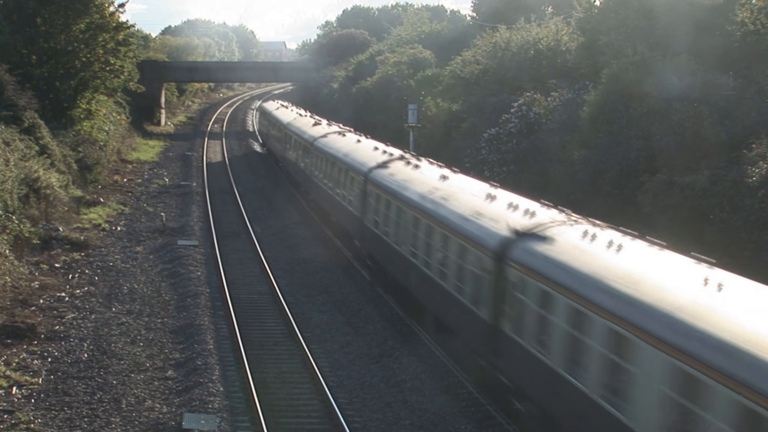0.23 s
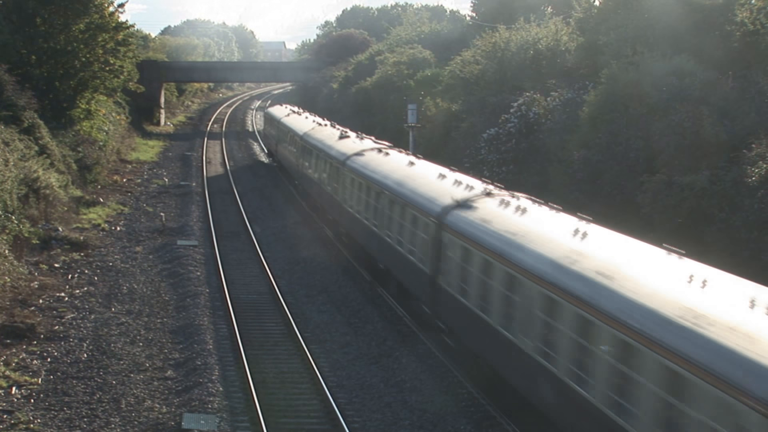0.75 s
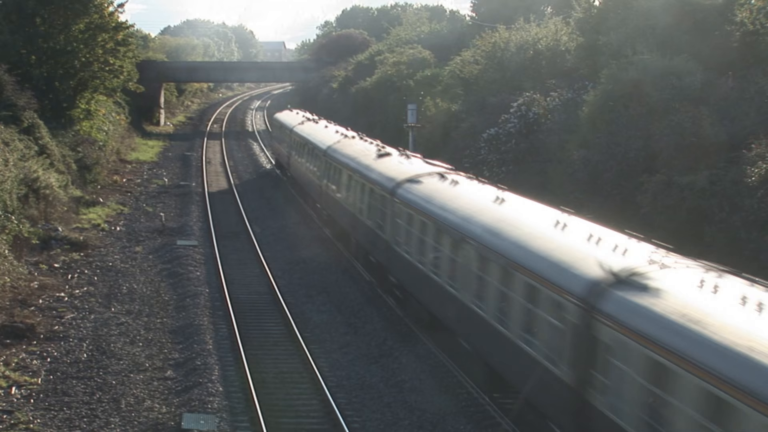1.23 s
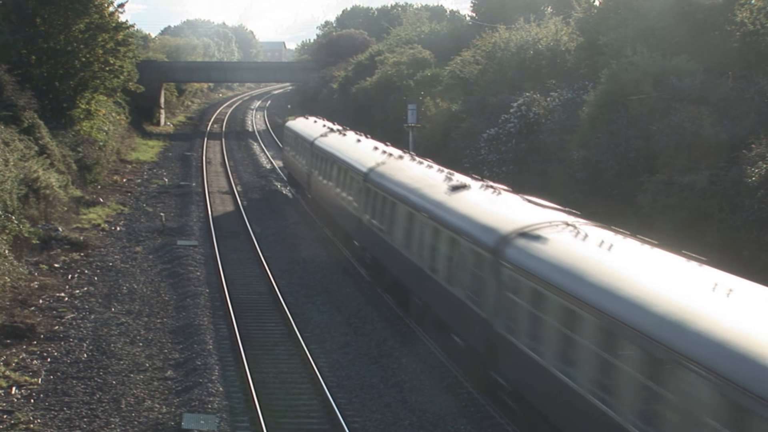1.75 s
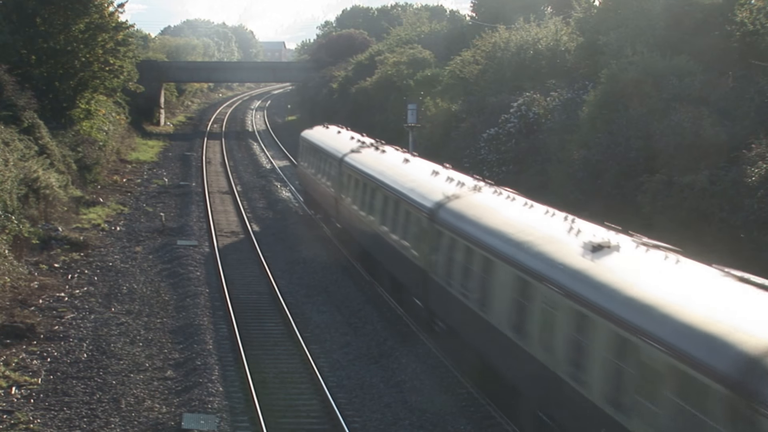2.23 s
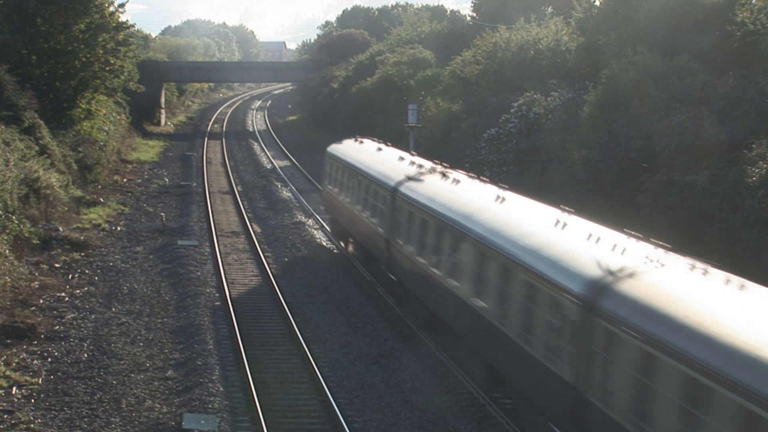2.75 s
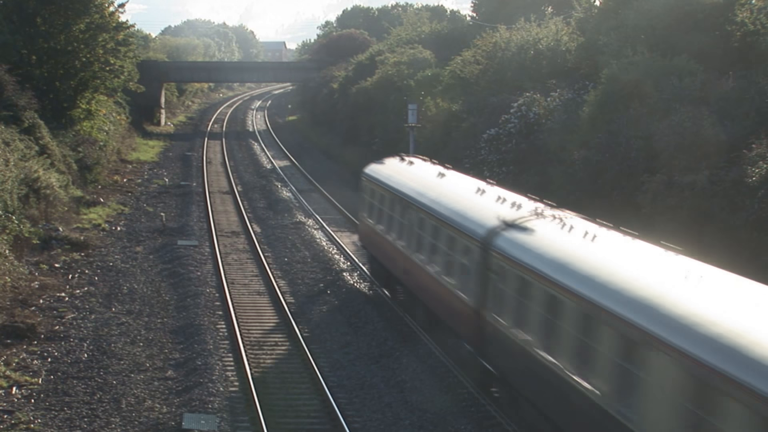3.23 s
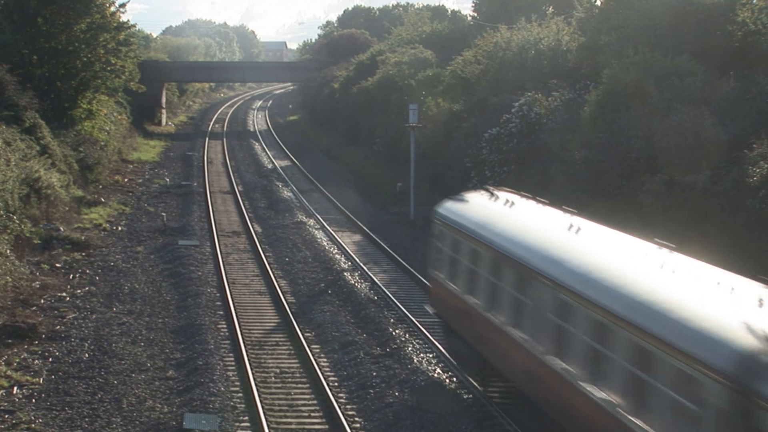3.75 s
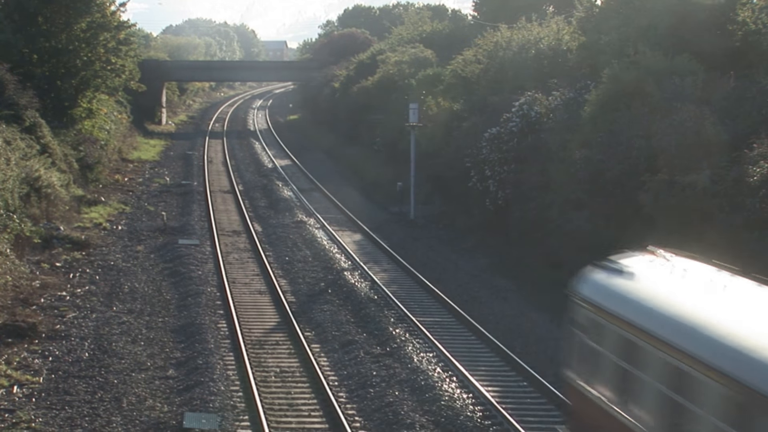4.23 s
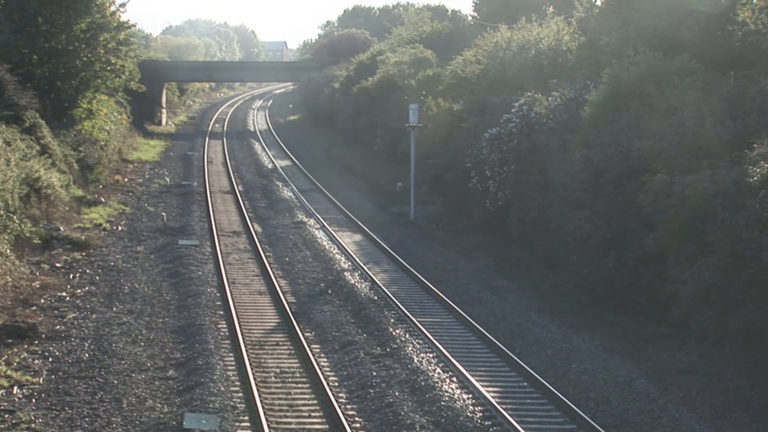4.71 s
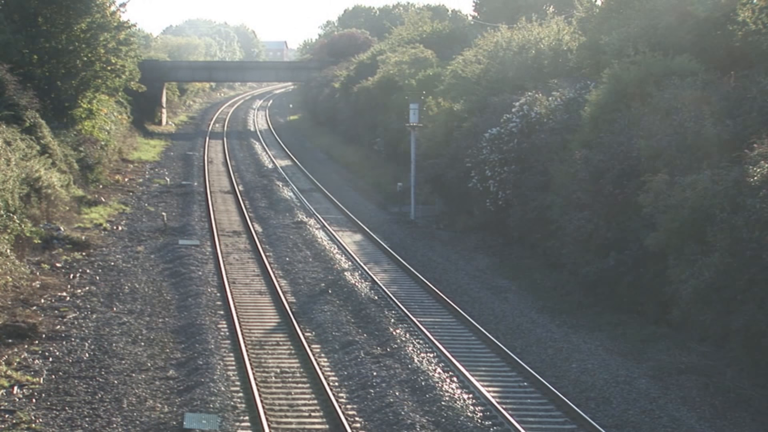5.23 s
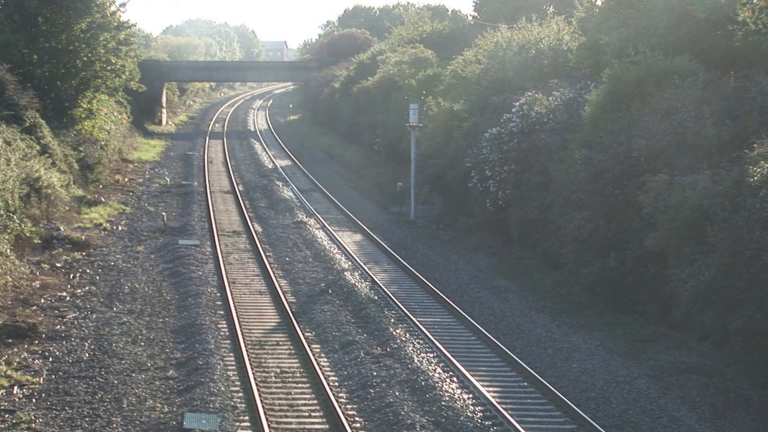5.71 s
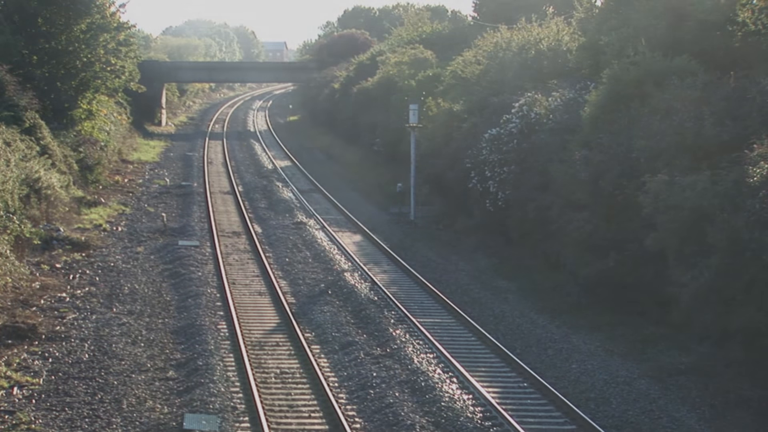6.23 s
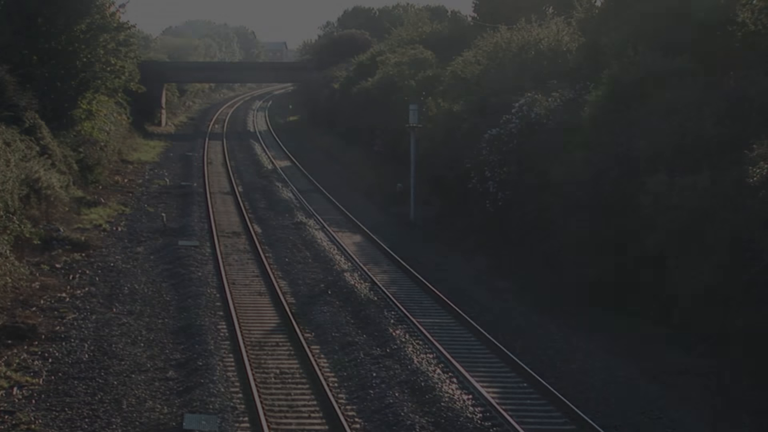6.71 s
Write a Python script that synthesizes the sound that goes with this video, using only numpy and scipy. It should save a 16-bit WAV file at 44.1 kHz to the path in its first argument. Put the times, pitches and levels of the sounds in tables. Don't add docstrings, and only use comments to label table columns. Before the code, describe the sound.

A loud, broad train roar fills the outdoor stereo picture from the start, pulsing as bogies roll by beneath the microphone, rails and wheels ringing over panel drumming, hiss and a low drone. Two tiny high metal clinks come early, close by. Once the last coach has gone under, the roar falls away and dulls, and the engine's fast breathy chuffs stand out from ahead, with soft wind thuds.

```python
import sys
import numpy as np
from scipy import signal
from scipy.io import wavfile
from scipy.ndimage import uniform_filter1d

SR = 44100
rng = np.random.default_rng(int(sys.argv[2]) if len(sys.argv) > 2 else 0)


def transcribe(u):
    v = np.clip(np.atleast_2d(u).T, -1, 1)
    q = np.round(v * 32767).astype(np.int16)
    wavfile.write(sys.argv[1], SR, q)


def convert_level_to_amplitude(level_db):
    exponent = np.asarray(level_db, float) / 20
    return 10 ** exponent


N = 307377

SIZE, HOP = 1024, 256
HZ = np.fft.rfftfreq(SIZE, 1 / SR)[:, None]
T = np.arange(N // HOP + 5) * HOP / SR


def columns(rows, t):
    s, *values = np.transpose(rows)
    return [np.interp(t, s, v) for v in values]


def read(points, hz, axis=1):
    points = np.array(points)
    return np.interp(np.log(hz + 1), np.log(points[:, 0] + 1), points[:, axis])


def rings(modes, sag=1):
    power = 0
    for hz, width, db in modes:
        detune = 2 * (HZ - hz * sag) / width
        power = power + convert_level_to_amplitude(db) ** 2 / (1 + detune ** 2) ** 2
    return power


def below(hz, order):
    return 1 / (1 + (HZ / hz) ** order)


def above(hz, order):
    return 1 / (1 + (hz / (HZ + 1)) ** order)


def scaled(power, lo_hz, hi_hz, db):
    band = (HZ[:, 0] > lo_hz) & (HZ[:, 0] < hi_hz)
    return power / power[band].sum(0) * convert_level_to_amplitude(db) ** 2


def patches(bins, frames):
    field = rng.standard_normal((len(T), len(HZ))).T
    field = uniform_filter1d(uniform_filter1d(field, bins, 0), frames, 1)
    return field / field.std()


def swells(events, width_s, t):
    return np.exp(-((t - np.array(events)[:, :1]) / width_s) ** 2 / 2)


def puffs(events, rise_s, fall_s):
    t = np.arange(round(.2 * SR)) / SR
    shape = (1 - np.exp(-t / rise_s)) ** 2 * np.exp(-t / fall_s)
    s, peak_db = np.transpose(events)
    starts = np.zeros(N)
    starts[np.round(s * SR).astype(int)] = convert_level_to_amplitude(peak_db)
    return signal.oaconvolve(starts, shape / shape.max())[:N]


# f/Hz, in step/1, a quarter turn ahead/1
MID_IN_SIDE = [(60, -0.092, -0.02), (250, 0.36, -0.55), (600, -0.06, -0.58), (1200, -0.39, -0.42),
               (1500, -0.53, -0.15), (1900, -0.63, 0.29), (2700, -0.3, -0.32), (3700, 0.47, -0.3),
               (4600, -0.04, -0.45), (5300, -0.052, 0.04), (7000, -0.22, 0.09), (9700, -0.16, 0.34),
               (11500, -0.34, 0.03), (14000, -0.19, 0.22)]
# f/Hz, level/dB
SIDE_LOW = [(30, -31), (60, -32), (110, -36), (190, -46), (260, -13), (330, -11.5), (600, -3.5),
            (1100, -4.5), (1420, -1.5), (1900, -7.5), (2300, -12.5), (2950, -16), (3400, -14)]
SIDE_HIGH = [(3400, -10.8), (3900, -0.5), (4500, 1.5), (5100, -2), (5700, 11.5), (6300, 12.5), (6900, 15),
             (7400, -3), (7900, 8), (9500, 4.5), (10700, -6), (12000, -2), (15500, -2.0)]
# f/Hz, level/dB
SIDE_AHEAD = [(250, 3), (700, 1), (1100, 2), (1420, -15), (1700, -8), (2400, -4), (3000, 3), (4000, 0.5),
              (8000, -3)]
# t/s, share/0-1
GONE_AHEAD = [(0, 0), (3.6, 0.02), (5.2, 0.04), (5.9, 0.57), (6.97, 0.86)]


def captured(power):
    a, b, c, d = rng.standard_normal((len(T), len(HZ), 4)).T
    link = read(MID_IN_SIDE, HZ) + 1j * read(MID_IN_SIDE, HZ, axis=2)
    mid = a + 1j * b
    side = link * mid + np.sqrt(np.clip(1 - abs(link) ** 2, 0, 1)) * (c + 1j * d)
    side_curve = list(SIDE_LOW) + list(SIDE_HIGH)[1:]
    side_db = read(side_curve, HZ) + read(SIDE_AHEAD, HZ) * columns(GONE_AHEAD, T)[0]
    z = np.sqrt(3 / 2 * power) * np.array([mid, side * convert_level_to_amplitude(side_db)])
    return signal.istft(z, nperseg=SIZE, noverlap=SIZE - HOP)[1][:, :N]


# t/s, level/dB
ROAR_LEVEL = [(0, -22.5), (.4, -19), (.9, -21.5), (1.26, -18.5), (1.62, -20.5), (1.95, -19), (2.25, -21),
              (2.82, -17.5), (3, -21), (3.43, -18.5), (3.75, -22), (4.2, -18.5), (4.62, -22), (4.95, -21),
              (5.2, -27.5), (5.9, -31), (6.8, -34.5), (6.97, -39)]


def nearness():
    return columns(ROAR_LEVEL, T)[0] + 20


# f/Hz, level/dB per Hz
ROAR_SPECTRUM = [(200, 4.7), (300, -3), (400, -7), (560, 1.45), (780, 1.35), (1100, 1.5), (1450, -6.5),
                 (1620, -6), (2250, -3), (2750, -9), (3300, -12.5), (3550, -23), (4000, -7)]
# t/s, factor/1
ROAR_SAG = [(0, 1.06), (1, 1.07), (2, 1.03), (3, 1), (4, 0.92), (5, 0.86), (5.8, 1.04), (6.97, 1.46)]
# t/s, rail ring level/dB, tyre ring level/dB, rim ring level/dB, web ring level/dB
BOGIE_PASSES = [(0.25, 1, -1, 0.5, 2.5), (0.55, 9, 4, 1, 1.5), (0.9, -1, 3, 1, 0), (1.25, 1, 3.5, 4.5, 3),
                (1.5, -1, 3.5, -4, -2), (2.03, 10.5, 9, 1, 4.5), (2.502, 6.5, 5.5, -2.5, -1.5),
                (2.82, 2, 2.5, 2, 1.5), (3.45, 6, 5, -1, 1), (4.05, 8.5, 7, -1, 1.5), (4.3, 9, 7.5, 1, 2.5),
                (4.68, 6.5, 9.5, 0.5, 0.5), (4.97, 10.5, 1, -3.5, -1), (5.4, 7, 1, -6, -5),
                (5.85, -3, 6, -1, 3), (6.2, -4, 7, 1, -2), (6.55, -8, 8, -0.5, -2)]
# f/Hz, width/Hz, level/dB
RAIL_RINGS = [(653, 61, 6)]
WEB_RINGS = [(905, 165, 5.5), (1260, 360, -0.5)]
RIM_RINGS = [(2520, 264, -1), (2840, 380, -6)]


def rolling():
    roar_db = columns(ROAR_LEVEL, T)[0] + 0.4 * patches(500, 5)[60]
    ring_db = np.array(BOGIE_PASSES)[:, 1:].T @ swells(BOGIE_PASSES, .14, T)
    rail_db, tyre_db, rim_db, web_db = ring_db
    sag = columns(ROAR_SAG, T)[0]
    roar = convert_level_to_amplitude(read(ROAR_SPECTRUM, HZ / sag ** 0.33)) ** 2 * above(300, 4)
    near = convert_level_to_amplitude(0.26 * np.minimum(uniform_filter1d(roar_db, 40) + 25, 0)) ** 2
    rail = rings(RAIL_RINGS, sag ** 0.06) * convert_level_to_amplitude(rail_db - 5.5) ** 2
    tyre_hz = 1993 - 22.3 * T
    tyre = rings([(tyre_hz, 224, -0.5)]) * convert_level_to_amplitude(tyre_db - 3) ** 2
    web = rings(WEB_RINGS[:1], sag ** 0.023) * convert_level_to_amplitude(web_db - 1) ** 2
    web = web + rings(WEB_RINGS[1:], sag)
    top = above(2200, 8)
    power = (roar + near * rings(RIM_RINGS)) * convert_level_to_amplitude(top * (rim_db - 2.5)) ** 2
    power = power + near * (rail + web + tyre)
    level_db = roar_db - columns(GONE_AHEAD, T)[0]
    return scaled(power, 330, 4600, level_db) * convert_level_to_amplitude(0.75 * patches(9, 14)) ** 2 * below(3500, 24)


# f/Hz, width/Hz, level/dB
PANEL_RINGS = [(274, 45, -4), (410, 59, 0.5), (489, 127, 0)]


def bodies():
    fewer = np.clip((T - 2.53) / 0.43, 0, 1)
    level_db = -34 + 0.78 * nearness() - 5 * fewer
    return scaled(rings(PANEL_RINGS), 270, 470, level_db + 1.4 * patches(30, 12))


# f/Hz, level/dB per Hz
FIZZ_SPECTRUM = [(3000, 19), (3500, -3), (4050, -12.5), (4500, -21), (5000, -18.5), (5500, -28),
                 (5900, -27.5), (6300, -37), (6800, -46), (7300, -43)]
HISS_SPECTRUM = [(6500, 0.5), (7300, -9), (8200, -6), (9300, -4.5), (10500, -0.5), (11600, 0), (13000, -3),
                 (15700, -5.5)]


def air():
    hiss_db = -57.5 + 0.68 * nearness()
    fizz_db = -43 + nearness() - 5 * columns(GONE_AHEAD, T)[0]
    flicker_db = 0.5 * patches(300, 4) + 0.43 * patches(12, 8)
    hiss = convert_level_to_amplitude(read(HISS_SPECTRUM, HZ)) ** 2 * above(6900, 24)
    tilt_db = 1.65 * np.maximum(hiss_db - fizz_db + 19, 0) * np.log2((HZ + 1) / 4500)
    fizz = convert_level_to_amplitude(read(FIZZ_SPECTRUM, HZ) + tilt_db) ** 2 * above(3500, 24) * below(6900, 24)
    hiss = scaled(hiss, 9500, 12200, hiss_db + 0.75 + flicker_db)
    return hiss + scaled(fizz, 3793, 8300, fizz_db + 0.21 * patches(20, 8))


# f/Hz, level/dB per Hz
RUMBLE_SPECTRUM = [(8.8, -39), (15, 4), (113, 10.5), (140, -8), (180, -31), (310, -120)]
# t/s, side capsule level/dB, mid capsule level/dB
WIND_GUSTS = [(0.2, -64, -40), (0.7, -71, -42.5), (1.1, -65, -46), (2.1, -68, -59), (2.9, -62, -44),
              (3.49, -49, -45), (3.95, -56, -42), (4.17, -48, -43), (4.81, -46, -42), (5.32, -44, -43),
              (5.6, -44, -46), (5.9, -47, -46), (6.29, -45, -48), (6.75, -52, -61)]
GUST_S = .11


def ground():
    gusts = convert_level_to_amplitude(np.array(WIND_GUSTS)[:, 2]) @ swells(WIND_GUSTS, GUST_S, T)
    rumble = convert_level_to_amplitude(read(RUMBLE_SPECTRUM, HZ)) ** 2 * above(35, 2)
    train = convert_level_to_amplitude(-47 + 0.24 * nearness())
    return scaled(rumble, 50, 125, 0) * (train ** 2 + gusts ** 2)


def wind():
    gusts = convert_level_to_amplitude(np.array(WIND_GUSTS)[:, 1]) @ swells(WIND_GUSTS, GUST_S, T)
    gusts = gusts + convert_level_to_amplitude(-71)
    lumps = scaled(convert_level_to_amplitude(read(RUMBLE_SPECTRUM, HZ * 1.15)) ** 2, 25, 120, 0)
    strong, other = captured(lumps * gusts ** 2)
    return np.array([convert_level_to_amplitude(11) * other, strong])


STROKE_LEVELS = [-24.5, -24.5, -27.5, -31]


def thumps():
    beat_s, beats_per_s = 5.462, 17.04
    k = np.arange(-int(beat_s * beats_per_s), int((N / SR - beat_s) * beats_per_s))
    off = rng.standard_normal((len(k), 2))
    s = beat_s + k / beats_per_s + 0.0055 * off[:, 0] + 0.0038
    return np.transpose([s, np.array(STROKE_LEVELS)[k % 4] + 2 * off[:, 1]])


# t/s, level/dB
DRAUGHT = [(0, -32.5), (.7, -37), (1.15, -33), (1.65, -38), (2.05, -31.5), (2.4, -39), (2.9, -33.5),
           (3.3, -39), (3.75, -38.5), (4.3, -36), (5.1, -37), (5.6, -41), (5.72, -34.5), (6.1, -36),
           (6.3, -34), (6.75, -38.5), (6.97, -38)]
# f/Hz, width/Hz, level/dB
CHIMNEY_PIPE = [(183.5, 39.4, -0.5), (203, 48, -1)]


def chimney():
    t = np.arange(N) / SR
    gas = rng.standard_normal((N, 2)).T + 0j
    tone = 0
    for hz, width, db in CHIMNEY_PIPE:
        turn = np.exp(2j * np.pi * hz * t)
        r = np.exp(-np.pi * width / SR)
        ringing = signal.lfilter([1], np.poly([r, r]), gas / turn)
        tone = tone + convert_level_to_amplitude(db) * turn * ringing * width ** 1.5
    tone = (tone / (abs(tone) + 0.44 * tone.std()) ** 0.6).real
    boom = convert_level_to_amplitude(28.5) * puffs(thumps(), 0.0056, 0.019)
    level = convert_level_to_amplitude(columns(DRAUGHT, t)[0]) * np.hypot(convert_level_to_amplitude(-0.5), boom)
    return tone / tone.std() * level * convert_level_to_amplitude([[0], [-26]])


# t/s, peak level/dB, then the level/dB of each of the four modes
METAL_CLINKS = [
    (1.0575, -34.5, -3.5, -9, -7, -8),
    (1.1737, -39, -30, -3, -10, -4),
]
# f/Hz, t60/s
METAL_MODES = [(9410, 0.088), (12265, .12), (12960, .08), (14740, .09)]
# t/s, peak level/dB, f/Hz
LIGHT_TOUCHES = [
    (1.0126, -42, 13050),
    (1.0126, -47, 14400),
    (1.262, -44, 13700),
]


def clinks():
    t = np.arange(round(.15 * SR)) / SR
    out = np.zeros((2, N))
    phase = np.array([[0], [2.2]])
    share = np.array([[1], [.8]])
    strokes = [(*touch, .018) for touch in LIGHT_TOUCHES]
    for s, peak_db, *mix in METAL_CLINKS:
        for db, (hz, t60) in zip(mix, METAL_MODES):
            strokes.append((s, peak_db + db, hz, t60))
    for s, db, hz, t60 in strokes:
        ring = convert_level_to_amplitude(db - 60 * t / t60) * np.sin(2 * np.pi * hz * t + phase)
        out[:, round(s * SR):][:, :len(t)] += share * ring
    return out


# t/s, peak level/dB
EXHAUST_BEATS = [(4.7073, -22), (4.7712, -24), (4.8744, -37), (5.0041, -34), (5.069, -35), (5.1787, -31),
                 (5.2291, -34), (5.3005, -36), (5.3379, -42), (5.4581, -23), (5.5294, -23), (5.6826, -24),
                 (5.7519, -27.5), (5.8821, -28), (5.9415, -24.5), (5.9964, -30), (6.1096, -20.5),
                 (6.177, -19), (6.3336, -26), (6.41, -20.5), (6.5741, -25), (6.6349, -24), (6.6903, -27),
                 (6.812, -30), (6.8684, -24), (6.9283, -28)]
# f/Hz, level/dB per Hz
STEAM_JET = [(350, -37), (700, -9), (1200, 2), (1750, 4.5), (2200, -4), (2700, -7.5), (3250, -9),
             (3700, -34), (4500, -28), (9000, -90)]


def exhaust():
    power = convert_level_to_amplitude(read(STEAM_JET, HZ)) ** 2
    jet = captured(scaled(power, 1000, 3300, np.full(len(T), -10.5)))
    return jet * puffs(EXHAUST_BEATS, 0.008, 0.028)


def scene():
    noises = captured(rolling() + bodies() + air() + ground())
    mid, side = noises + wind() + chimney() + clinks() + exhaust()
    return np.array([mid + side, mid - side])


def top_cut(x):
    return signal.sosfilt(signal.butter(12, 16090, fs=SR, output="sos"), x)


def record(dry):
    z = signal.stft(dry, nperseg=SIZE, noverlap=SIZE - HOP)[2]
    edge_hz = np.where(T[:z.shape[2]] < 5.145, 15720, 15020)
    limited = signal.istft(z * (HZ < edge_hz), nperseg=SIZE, noverlap=SIZE - HOP)[1][:, :N]
    return top_cut(limited)


dry = scene()
out = record(dry)
transcribe(out)
```